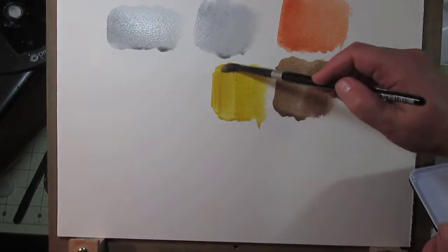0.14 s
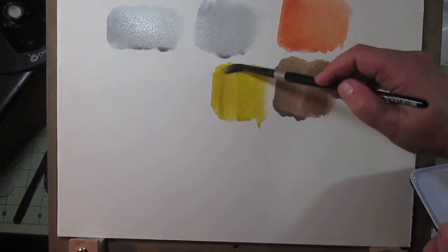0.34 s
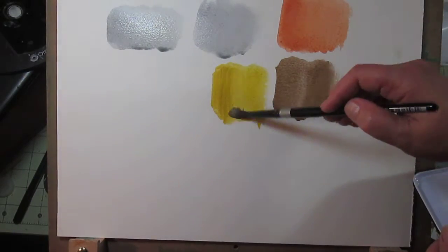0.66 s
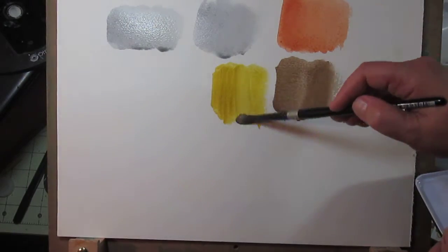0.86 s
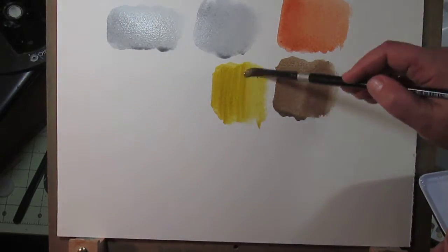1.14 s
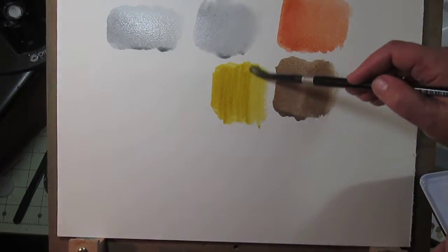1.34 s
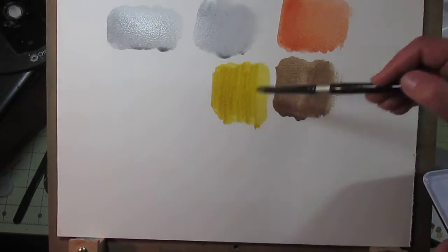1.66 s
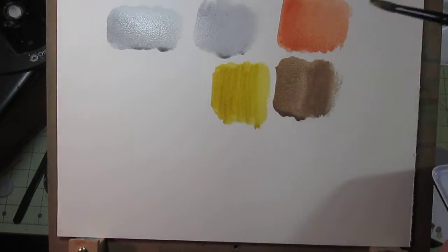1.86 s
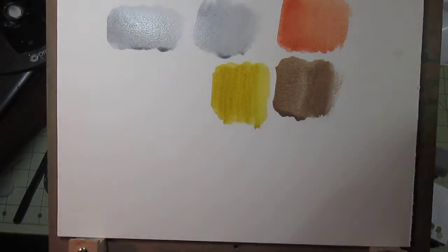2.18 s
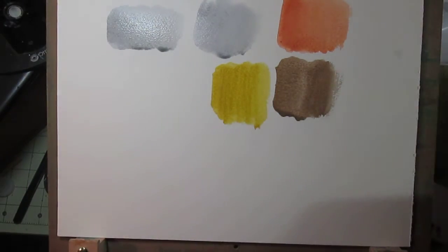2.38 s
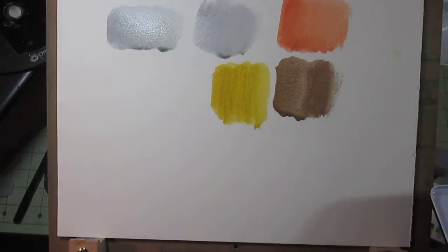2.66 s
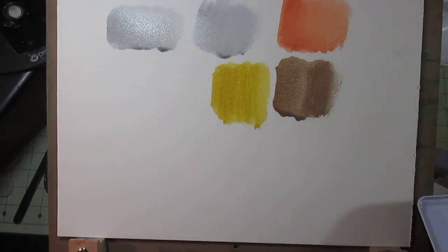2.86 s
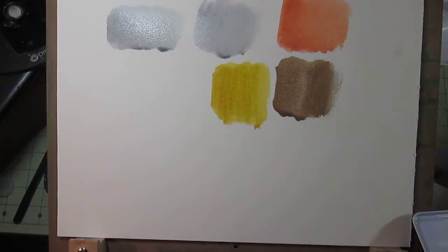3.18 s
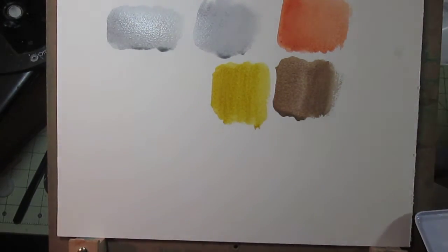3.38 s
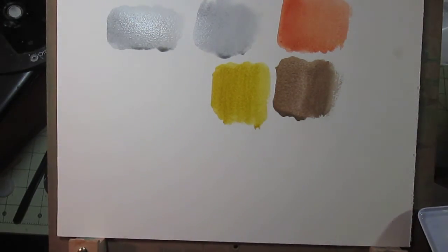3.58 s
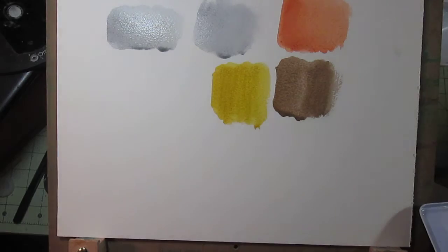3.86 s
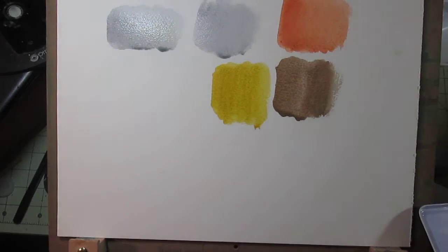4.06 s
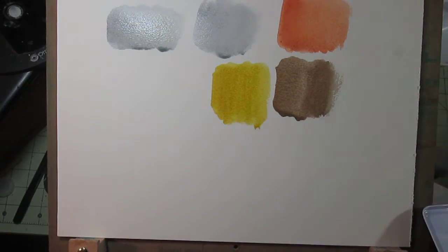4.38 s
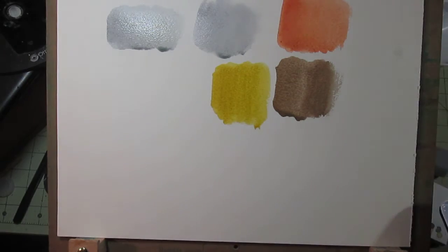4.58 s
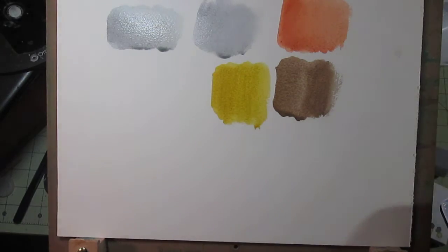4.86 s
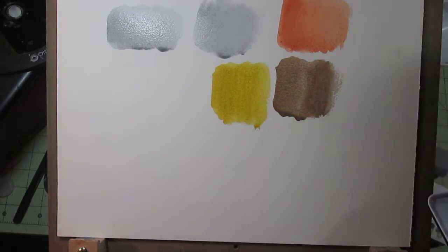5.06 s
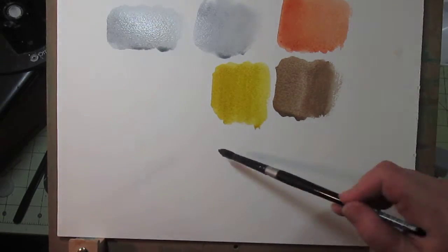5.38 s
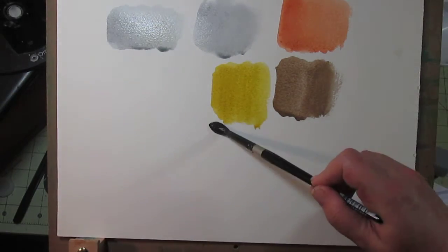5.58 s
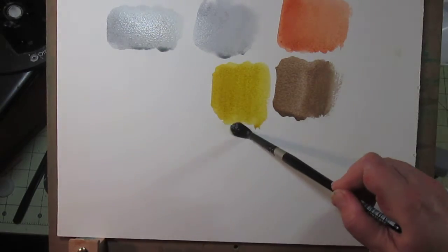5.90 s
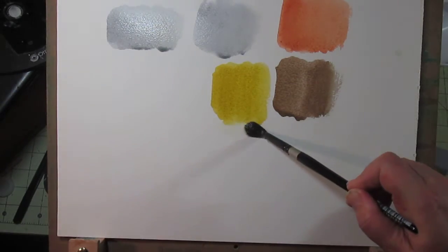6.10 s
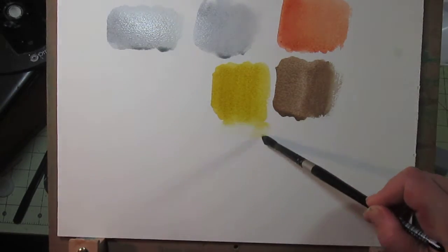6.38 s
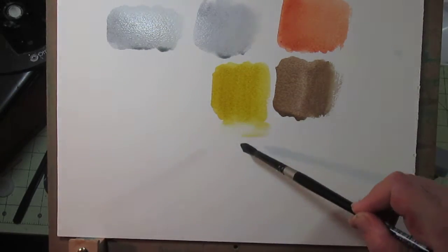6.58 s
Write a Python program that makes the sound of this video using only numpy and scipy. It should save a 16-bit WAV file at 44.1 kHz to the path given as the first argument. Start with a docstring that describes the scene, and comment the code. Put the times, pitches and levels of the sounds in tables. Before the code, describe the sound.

Faint brush strokes on paper give way to a brush being rinsed in water, gurgling and knocking against the glass in a quiet room.

```python
"""A watercolour brush is swished in a glass jar of water. Its handle knocks on the glass and excites
damped modes, while trapped air pockets and bubbles resonate as gulps, plops and splashes.
Beforehand the bristles stroke paper at a desk, making friction noise; afterwards they are wiped
with faint wet ticks and drag over the paper again. A small room hums; a camera whines faintly."""
import sys
import numpy as np
from scipy import signal
from scipy.fft import rfft, irfft, next_fast_len
from scipy.io import wavfile
from scipy.ndimage import map_coordinates

SR = 44100
rng = np.random.default_rng(int(sys.argv[2]) if len(sys.argv) > 2 else 0)


def wrap_up_sound(samples):
    """Save the sound to the file named by the first command line argument, as 16-bit audio."""
    columns = np.atleast_2d(samples).T
    # keep every value between -1 and 1, then stretch to whole-number steps
    tamed = np.clip(columns, -1, 1)
    steps = np.round(tamed * 32767).astype(np.int16)
    wavfile.write(sys.argv[1], SR, steps)


N = 297409
TIME = np.arange(N) / SR  # scene time [s]
T = TIME[:SR // 2]  # time within one event [s]

# impacts of handle on glass: (time [s], clack level [dB], treble gain [dB], handle frequency [Hz],
# relative handle level [dB], water-loaded wall frequency [Hz], wall level [dB], glass level [dB])
KNOCKS = [(2.9409, -13.5, 6, 8150, -13.5, 399, -20.5, -42.5), (3.1859, -17, 2, 2597, -9, 457, -44, -36),
          (3.5299, -25, -1.5, 2670, -16.5, 544, -29.5, -42.5),
          (3.6151, -16.5, -3, 3773, -12, 553, -17.5, -39), (3.7020, -37, 0, 2640, -26.5, 590, -34, -45.5),
          (3.9333, -19, -5, 3720, -21.5, 703, -28, -38), (4.3171, -35.5, 2, 3080, -37.5, 443, -40, -57.5)]
# modes of the glass: (frequency [Hz], relative level [dB], T60 [s])
GLASS_MODES = [(438.8, -5.5, 0.54), (990, -5, 0.095), (1502, 6, 0.32), (2300, -4, 0.22), (2716, -9, 0.19),
               (3486, -2, 0.33), (4328, -9, 0.23), (4719, -3.5, 0.17), (6600, -24, 0.28)]
# dry clack of a contact: (frequency [Hz], relative spectral density [dB])
CLACK_SPECTRUM = [(60, -29), (300, -5.5), (600, 2.5), (1000, 8), (1330, -2), (1800, -4), (2400, 6),
                  (3200, -7), (4500, 3.5), (6900, -6), (8800, -14.5), (12500, -22.5), (16000, -44)]
# air pockets shrinking as the brush plunges: (time [s], duration [s], level before the air column [dB])
GLUGS = [(2.976, .058, -12), (3.043, .074, -14.5)]
# modes of the air column above the water: (frequency [Hz], bandwidth [Hz], gain [dB])
AIR_COLUMN_MODES = [(470, 130, -20.5), (946, 93, -4.5), (1466, 92, -8.5), (2570, 330, -11.5)]
# air pockets closing behind the brush, most near the air column's main mode:
# (crest time [s], frequency [Hz], level [dB])
PLOPS = [(2.939, 440, -25.5), (2.987, 801, -21.5), (2.998, 920, -21), (3.063, 990, -21), (3.100, 1630, -28),
         (3.179, 943, -14.5), (3.264, 1010, -16.5), (3.349, 950, -22), (3.507, 990, -15.5),
         (3.534, 960, -24), (3.597, 992, -18), (3.624, 951, -17.5), (3.678, 970, -24), (3.777, 1070, -29.5),
         (3.991, 1010, -28.5), (4.275, 857, -27.5)]
# water hitting the glass or falling back: (time [s], decay time [s], bubble frequency [Hz], level [dB])
SPLASHES = [(3.082, .022, 1430, -41), (3.167, .012, 2570, -34), (3.188, 0.011, 2510, -22),
            (3.312, .025, 1190, -39.5), (3.442, 0.044, 1390, -38.5), (3.502, 0.011, 1320, -29.5),
            (3.531, 0.0066, 2600, -29), (3.578, 0.012, 1420, -33.5), (3.899, 0.024, 1920, -44.5),
            (3.973, 0.0094, 2420, -37.5), (4.072, 0.027, 1500, -40), (4.131, 0.014, 1650, -36.5),
            (4.232, 0.0072, 1490, -38.5), (4.266, 0.0075, 1410, -29)]
# high spits of the wet bristles, then a few faint late ticks: (time [s], frequency [Hz], level [dB])
SPITS_AND_TICKS = [(2.916, 4530, -42), (3.039, 11700, -42.5), (3.039, 6800, -45), (3.175, 7060, -38),
                   (3.271, 6060, -40.5), (3.342, 5680, -39.5), (3.579, 11900, -53), (3.595, 6440, -44),
                   (3.702, 6360, -51), (3.762, 6000, -48.5), (3.824, 6800, -47.5), (3.907, 7100, -46),
                   (4.849, 3200, -57), (4.917, 5200, -55), (5.187, 6800, -55)]
# friction of bristles on paper: (frequency [Hz], relative spectral density [dB])
PAPER_SPECTRUM = [(300, -10), (1500, 5.5), (3000, 0), (4800, 3), (7000, -2), (10000, -9), (15000, -28)]
# envelope of the wet brush dragging over the paper: (time [s], level [dB])
DRAG_ENVELOPE = [(5.62, -85), (5.76, -58), (6.1, -62), (6.3, -67), (6.43, -58), (6.62, -62), (6.72, -77)]
# modes of the paper pad: (frequency [Hz], bandwidth [Hz], relative gain [dB])
PAD_MODES = [(520, 54, -2), (1400, 86, -3)]
# a low hum, its octave and the camera's whine: (frequency [Hz], level [dB])
HUM_TONES = [(54.5, -51.5), (111, -67), (11797, -79)]
# room air and microphone hiss: (frequency [Hz], relative spectral density [dB])
ROOM_SPECTRUM = [(10, -25), (22, -1), (32, 0), (42, -4), (60, -1), (85, -7), (175, -12.5), (700, -21),
                 (1400, -26), (4000, -35.5), (6500, -36.5), (9800, -43), (12500, -45), (16000, -57)]
# reverberation time of the room: (frequency [Hz], T60 [s])
ROOM_T60 = [(100, 0.9), (500, 0.19), (2500, 0.19), (6000, 0.19), (14000, 0.037)]
# narrow dips in the camera's response: (frequency [Hz], bandwidth [Hz])
NOTCHES = [(3945, 136), (7880, 38)]


def knocks(thump_re_clack_db=-14):
    """Impact excitation: each contact clacks and sets handle, glass and desk into free vibration."""
    out = np.zeros(N)
    for s, clack_db, treble_db, handle_hz, handle_db, wall_hz, wall_db, glass_db in KNOCKS:
        # each contact point gives the clack a brighter or duller treble
        clack = noise(CLACK_SPECTRUM, len(T))
        clack = unit(filtered(clack, lambda f: amp(treble_db * np.exp(-((f - 6000) / 2300) ** 2))))
        clack *= amp(clack_db) * struck(t60=0.057, attack=0.00005)
        # the handle bends in two planes at slightly different frequencies
        handle = ring(handle_hz, t60=0.025, attack=0.0018)
        handle += amp(-4.5) * ring(handle_hz - 170, t60=0.0084, attack=0.00084)
        handle *= amp(handle_db + 6.5)
        wall = amp(wall_db) * ring(wall_hz, t60=0.15, attack=0.00033)
        glass = sum(amp(glass_db + db + 2 * rng.standard_normal()) * ring(hz, t60, attack=.001)
                    for hz, db, t60 in GLASS_MODES)
        thump = filtered(rng.standard_normal(len(T)), lambda f: resonance(f, hz=109.6, width=59) ** 2)
        thump = amp(clack_db + thump_re_clack_db) * unit(thump) * struck(t60=0.2, attack=0.0033)
        add(out, s, in_room(clack, wet_db=-11.5) + in_room(handle + glass, wet_db=-11) + wall + thump)
    return out


def glugs(from_hz=450, to_hz=1874):
    """Bubble resonance: a shrinking air pocket rises in pitch and flares at each air-column mode."""
    out = np.zeros(N)
    for s, length, db in GLUGS:
        progress = np.minimum(T / length, 1)
        tone = trembling(from_hz + (to_hz - from_hz) * progress, depth_oct=0.086)
        add(out, s, amp(db) * tone * np.sqrt(1 - progress) * onset(0.001))
    hollow = filtered(out, lambda f: modal_response(AIR_COLUMN_MODES, f) + amp(-26.5))
    return in_room(hollow, wet_db=-15)


def plops(swell_s=0.0051, lead_s=0.05):
    """Damped oscillation: a closing air pocket swells into a short trembling tone and dies away."""
    out = np.zeros(N)
    from_crest = (T - lead_s) / swell_s
    rise = np.exp(-from_crest ** 2)
    fall = 1 / np.cosh(np.minimum(1.3 * from_crest, 50))
    envelope = np.where(from_crest < 0, rise, fall)
    for s, hz, db in PLOPS:
        tone = trembling(hz, depth_oct=0.052)
        lower_mode = amp(-19.5) * trembling(hz * .56, depth_oct=0.054)
        add(out, s - lead_s, in_room(amp(db) * envelope * (tone + lower_mode), wet_db=-9.5))
    return out


def splashes():
    """Bubble resonance: splashes ring in bursts; bristle spits and faint late ticks ring higher."""
    out = np.zeros(N)
    for s, decay_s, hz, db in SPLASHES:
        spread_oct = min(.75 * (1503 / hz) ** 2, 1)  # higher splashes are narrower
        add(out, s, amp(db) * burst(hz, spread_oct, decay_s, cycles=2.5))
    for s, hz, db in SPITS_AND_TICKS:
        add(out, s, amp(db) * burst(hz, spread_oct=0.19, decay_s=0.0053, cycles=2.8))
    return in_room(out, wet_db=-8.5)


def slosh(from_s=3.0, to_s=3.68, swish_db=-50, fade_s=.04, wake_re_plop_db=-19, settle_s=0.036):
    """Cavity resonance: the air column colours water churned by the swish and each plop, over a fizz."""
    outside_s = np.maximum(np.maximum(from_s - TIME, TIME - to_s), 0)
    stir = amp(swish_db) * np.exp(-outside_s / fade_s)
    for s, _, db in PLOPS:
        add(stir, s, amp(db + wake_re_plop_db) * np.exp(-T / settle_s) * onset(0.0025))
    churn = bubbles(N, per_s=700, centre_hz=1127, spread_oct=1.482, cycles=3.1)
    hollow = unit(filtered(churn, lambda f: modal_response(AIR_COLUMN_MODES, f)))
    fizz = amp(-25) * bubbles(N, per_s=3000, centre_hz=5000, spread_oct=1, cycles=3)
    return in_room((hollow + fizz) * stir, wet_db=-9)


def strokes(count=7, first_s=.016, period_s=.2013, sigma_s=.021):
    """Friction noise: bristles hiss to and fro on paper, pressing hardest in the middle stroke."""
    pressure = amp(-53) * swell(1.583, sigma_s=.018)  # the last flick off the paper
    for k, off_middle in enumerate(np.linspace(-1, 1, count)):
        s = first_s + k * period_s
        forth = swell(s, sigma_s)
        back = amp(-4.5) * swell(s + period_s / 2, sigma_s)
        pressure += amp(-55 - 6 * off_middle ** 2) * (forth + back)
    return pressure * noise(PAPER_SPECTRUM, N) * amp(wobble(150))


def wet_drag():
    """Forced vibration: friction of the wet brush drives the paper pad's modes in a dull rub."""
    rub = unit(filtered(rng.standard_normal(N), lambda f: modal_response(PAD_MODES, f)))
    return rub * amp(np.interp(TIME, *np.transpose(DRAG_ENVELOPE), left=-120))


def wiping(count=10, from_s=4.43, to_s=4.74, tick_hz=5170, tick_db=-64):
    """Bubble resonance: tiny bubbles tick at uneven intervals as the bristles are wiped."""
    out = np.zeros(N)
    for k, (late, pitch, scatter_db) in enumerate(rng.standard_normal((count, 3))):
        s = from_s + (to_s - from_s) * (k + .5 + late / 3) / count
        tick = burst(tick_hz * 2 ** (0.16 * pitch), spread_oct=.1, decay_s=.013, cycles=5)
        add(out, s, amp(tick_db + scatter_db) * tick)
    return in_room(out, wet_db=-16)


def background(noise_db=-49.8):
    """Superposition: a wavering hum and a thin whine lie over broadband rumble and hiss."""
    tones = np.zeros(N)
    for hz, db in HUM_TONES:
        peak = np.sqrt(2) * amp(db + 1.44 * wobble(4.9))
        tones += peak * np.sin(2 * np.pi * hz * TIME + 0.4 * wobble(1.9))
    return tones + amp(noise_db) * noise(ROOM_SPECTRUM, N)


def in_room(x, wet_db, build_s=0.0063):
    """Reverberation: a diffuse tail builds up behind the direct sound and dies faster in the treble."""
    hz, t, spectra = signal.stft(rng.standard_normal(len(T)), SR, nperseg=256)
    decay = amp(-60 * t / along(ROOM_T60, hz)[:, None])
    tail = signal.istft(spectra * decay, SR, nperseg=256)[1][:len(T)]
    tail *= np.clip(T / build_s, 0, 1) ** 2
    return x + amp(wet_db) * signal.fftconvolve(x, tail / np.linalg.norm(tail))[:len(x)]


def bubbles(size, per_s, centre_hz, spread_oct, cycles):
    """Damped oscillators: a bubble cloud of rms 1, each rising a little and decaying over `cycles`."""
    count = int(per_s * size / SR) + 1
    start, pitch, weakness = rng.random((count, 3)).T[:, :, None]
    hz = centre_hz * 2 ** (spread_oct * (2 * pitch - 1))
    t = T[:SR // 60]
    age = t * hz / cycles  # in time constants
    phase = 2 * np.pi * hz * t * (1 + 0.016 * np.minimum(age, 4))
    grains = amp(-14 * weakness) * np.sin(phase) * np.exp(-age) * (1 - np.exp(-6 * age))
    first_sample = ((np.arange(count)[:, None] + start) * size / count).astype(int)
    samples = (first_sample + np.arange(len(t))) % size
    return unit(np.bincount(samples.ravel(), grains.ravel(), size))


def burst(hz, spread_oct, decay_s, cycles):
    """Exponential decay of a dense bubble cloud after a sudden onset."""
    cloud = bubbles(len(T), per_s=1600, centre_hz=hz, spread_oct=spread_oct, cycles=cycles)
    return np.sqrt(2) * cloud * np.exp(-T / decay_s) * onset(0.00085)


def trembling(hz, depth_oct):
    """Frequency modulation of a tone by a quick random tremble."""
    tremble = map_coordinates(rng.standard_normal(160), [T * 300])
    return np.sin(2 * np.pi * np.cumsum(hz * 2 ** (depth_oct * tremble)) / SR)


def ring(hz, t60, attack):
    """Free vibration of one damped mode."""
    return np.sin(2 * np.pi * hz * T) * struck(t60, attack)


def struck(t60, attack):
    """Impact envelope: a quick rise and a decay of 60 dB in t60 seconds."""
    return amp(-60 * T / t60) * onset(attack)


def onset(attack):
    """Exponential approach to 1, with a time constant of `attack` seconds."""
    return 1 - np.exp(-T / attack)


def swell(s, sigma_s):
    """Gaussian envelope centred on s seconds."""
    return np.exp(-.5 * ((TIME - s) / sigma_s) ** 2)


def wobble(rate):
    """Smooth random modulation, rate knots a second."""
    return map_coordinates(rng.standard_normal(int(N * rate / SR) + 4), [TIME * rate])


def resonance(f, hz, width):
    """Frequency response of one damped resonator."""
    return 1j * f * width / (hz * hz - f * f + 1j * f * width)


def modal_response(modes, f):
    """Modal superposition: resonances summed with alternating sign."""
    return sum((-1) ** k * amp(db) * resonance(f, hz, width) for k, (hz, width, db) in enumerate(modes))


def noise(spectrum, size):
    """Spectral shaping of white noise, at rms 1."""
    return unit(filtered(rng.standard_normal(size), lambda hz: amp(along(spectrum, hz))))


def filtered(x, response):
    """Linear filtering: the spectrum of x times a frequency response."""
    size = next_fast_len(len(x) + 8192)
    return irfft(rfft(x, size) * response(np.fft.rfftfreq(size, 1 / SR)), size)[:len(x)]


def along(points, hz):
    """Interpolation of (frequency [Hz], value) points on a log-frequency axis."""
    f, values = np.transpose(points)
    return np.interp(np.log(hz + 1), np.log(f + 1), values)


def amp(db):
    """Decibels to amplitude ratio."""
    return 10 ** (np.asarray(db) / 20)


def unit(x):
    """Normalisation to rms 1."""
    return x / np.sqrt(np.mean(x ** 2) + 1e-20)


def add(track, s, sound):
    """Superposition of a sound on a track at s seconds."""
    start = max(round(s * SR), 0)
    track[start:start + len(sound)] += sound[:len(track) - start]


def scene():
    """Superposition: the pressures from jar, brush and room add at one microphone."""
    jar = knocks() + glugs() + plops() + splashes()
    return (jar + wiping() + slosh() + strokes() + wet_drag() + background())[None]


def record(dry, top_hz=15850):
    """Band limiting: the camera notches out two narrow bands and passes nothing above top_hz."""
    def response(f):
        dips = [1 - resonance(f, hz, width) for hz, width in NOTCHES]
        return np.prod(dips, axis=0) * (f < top_hz)
    return np.array([filtered(channel, response) for channel in dry])


dry = scene()
out = record(dry)
wrap_up_sound(out)
```